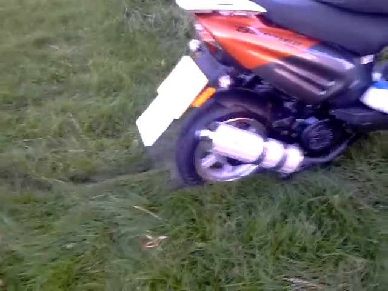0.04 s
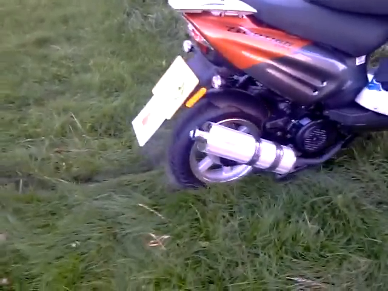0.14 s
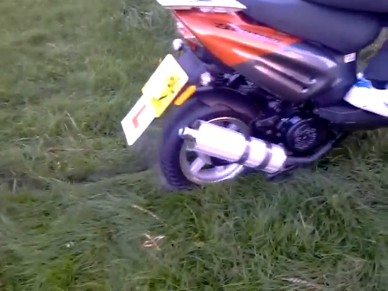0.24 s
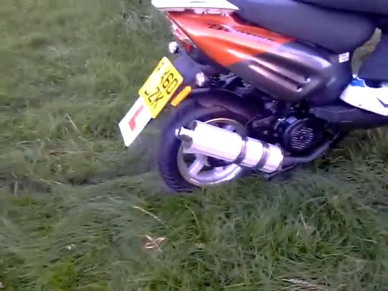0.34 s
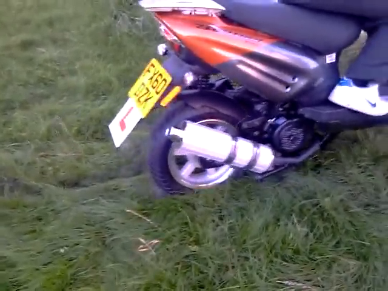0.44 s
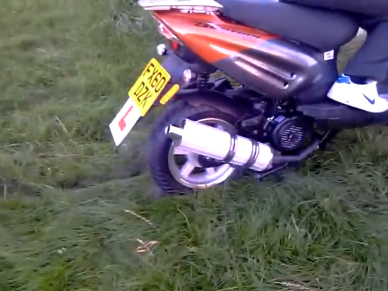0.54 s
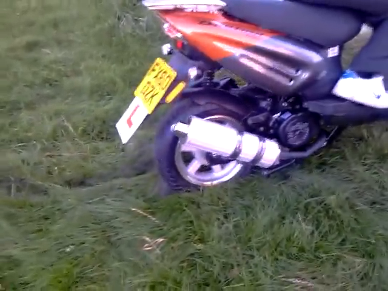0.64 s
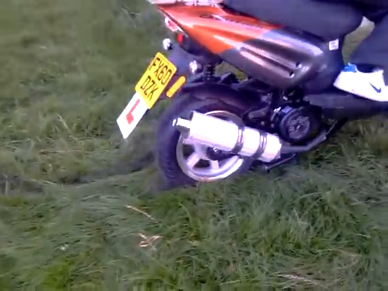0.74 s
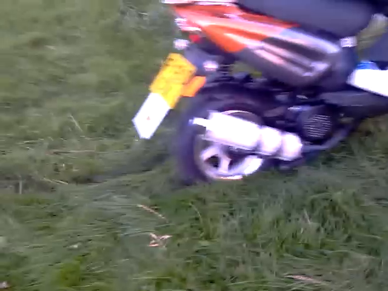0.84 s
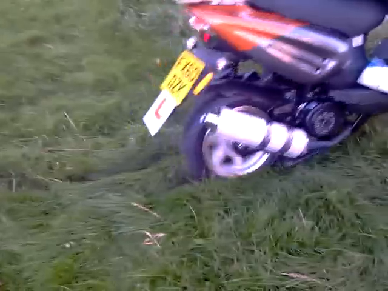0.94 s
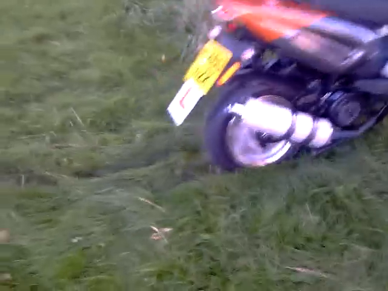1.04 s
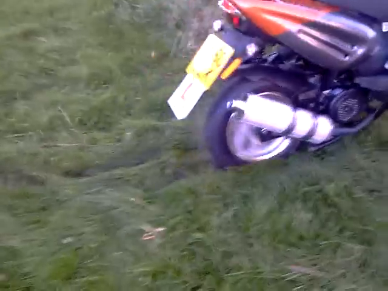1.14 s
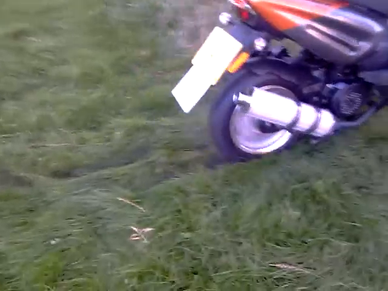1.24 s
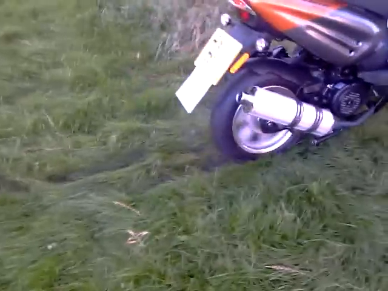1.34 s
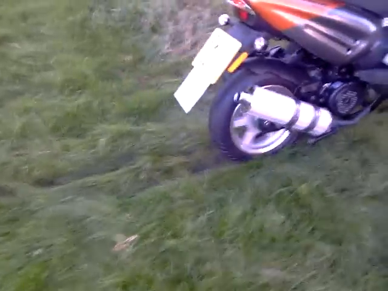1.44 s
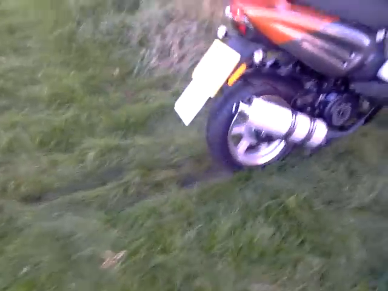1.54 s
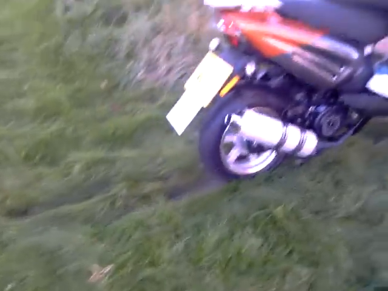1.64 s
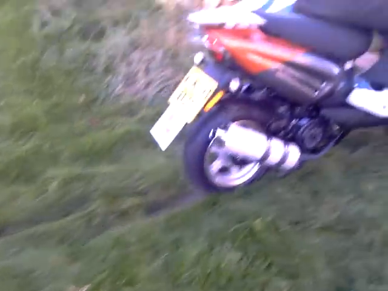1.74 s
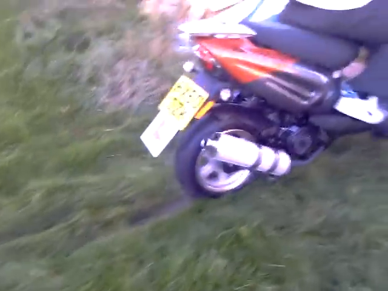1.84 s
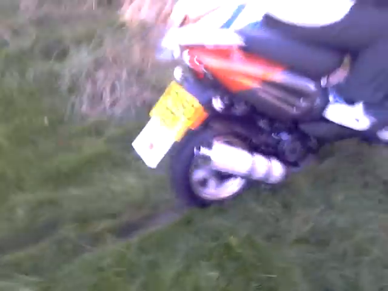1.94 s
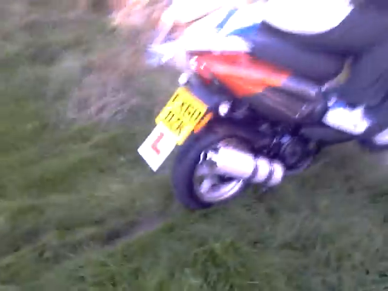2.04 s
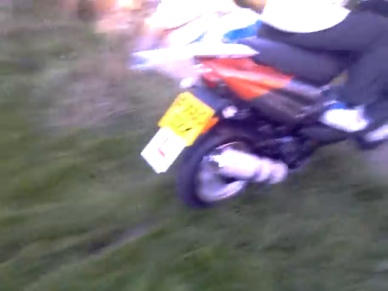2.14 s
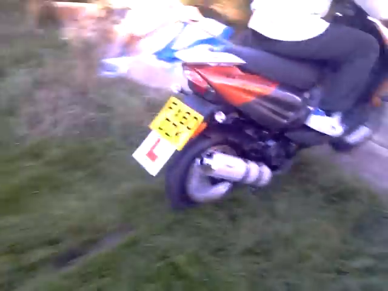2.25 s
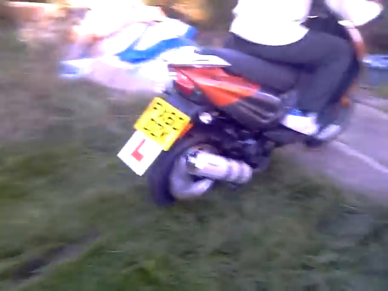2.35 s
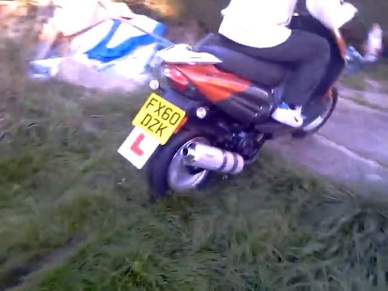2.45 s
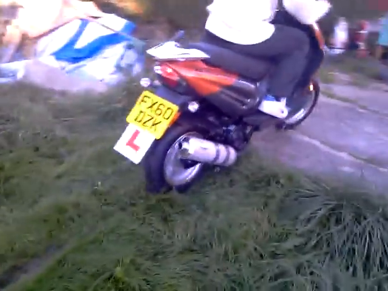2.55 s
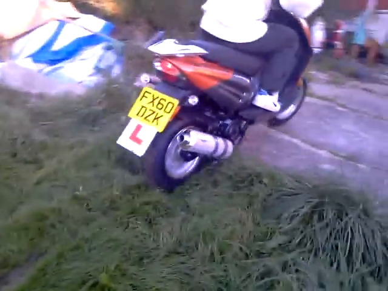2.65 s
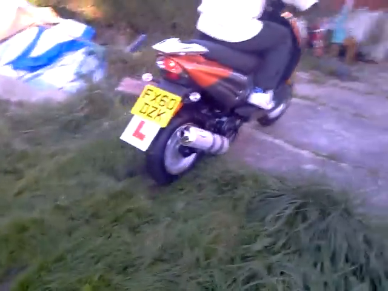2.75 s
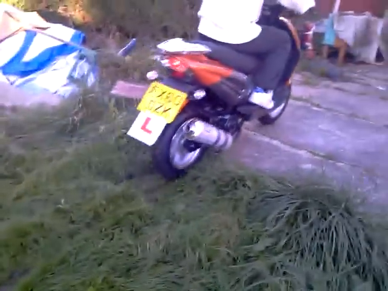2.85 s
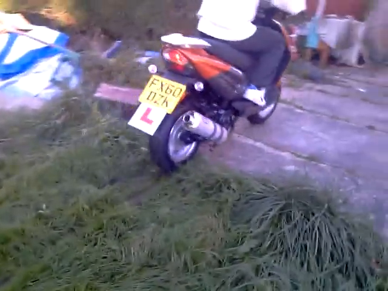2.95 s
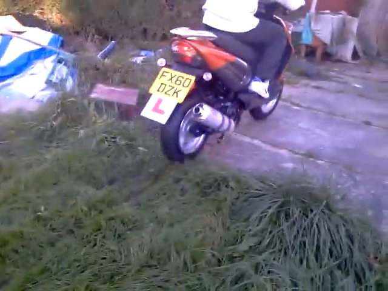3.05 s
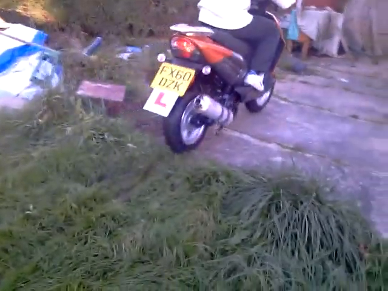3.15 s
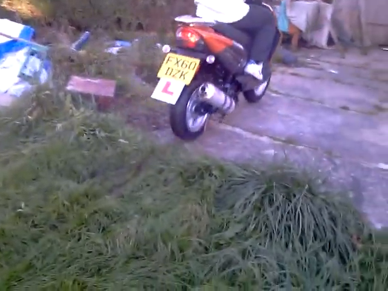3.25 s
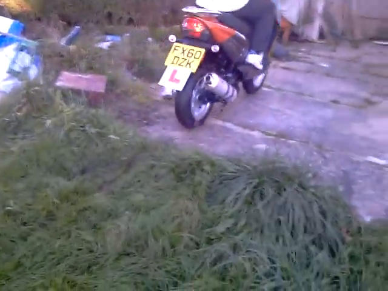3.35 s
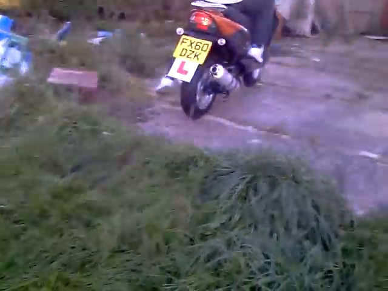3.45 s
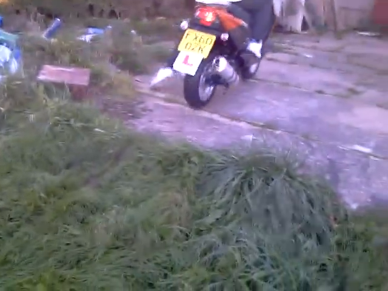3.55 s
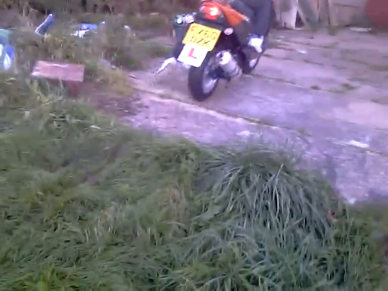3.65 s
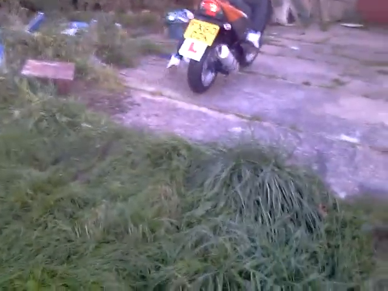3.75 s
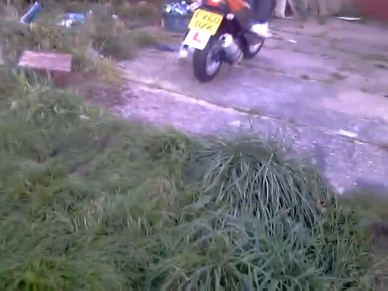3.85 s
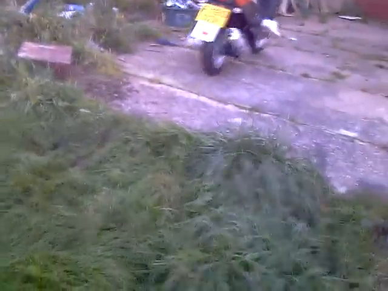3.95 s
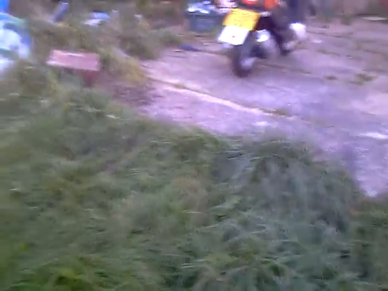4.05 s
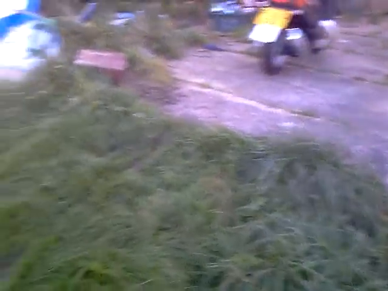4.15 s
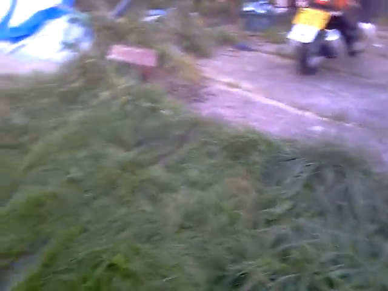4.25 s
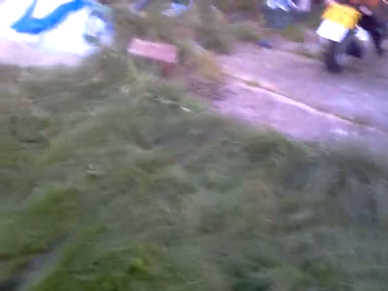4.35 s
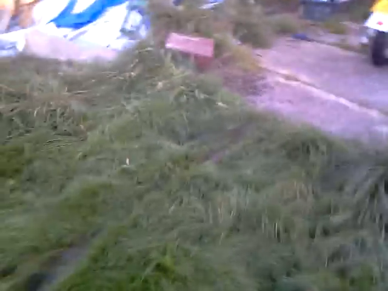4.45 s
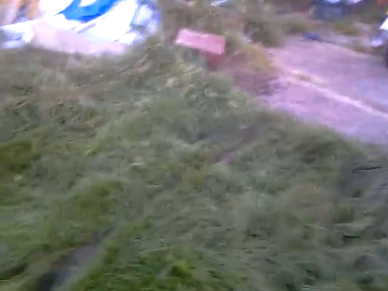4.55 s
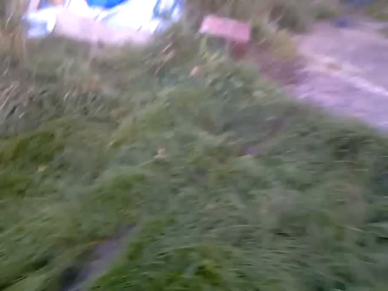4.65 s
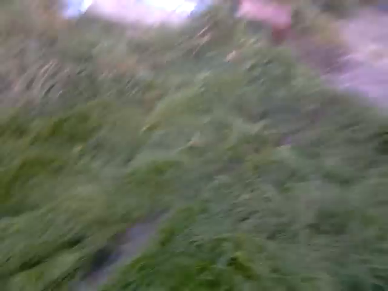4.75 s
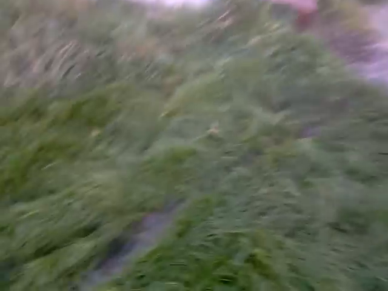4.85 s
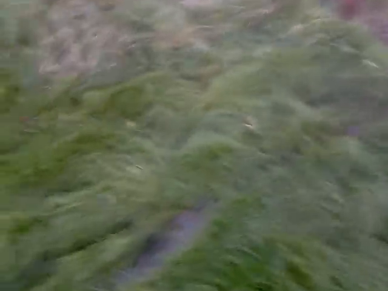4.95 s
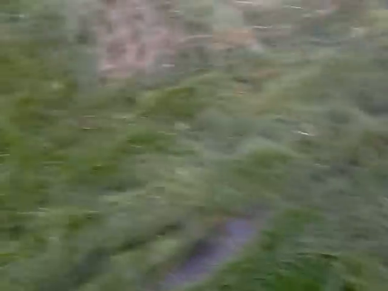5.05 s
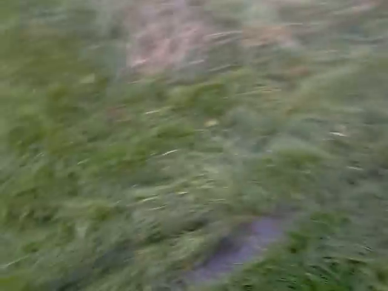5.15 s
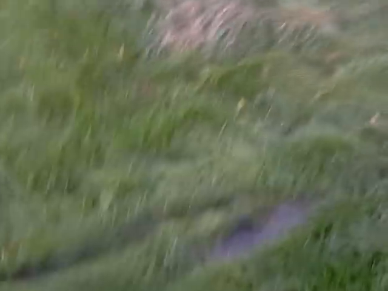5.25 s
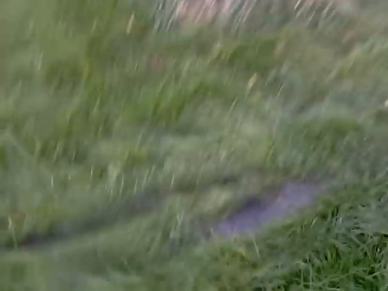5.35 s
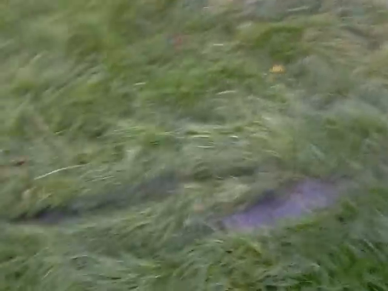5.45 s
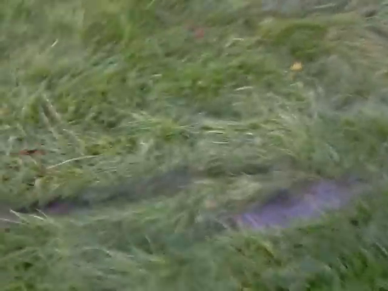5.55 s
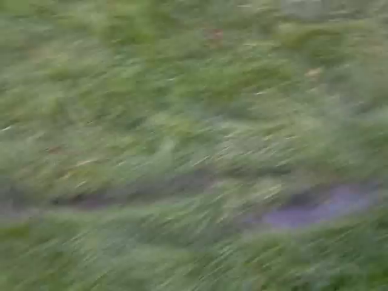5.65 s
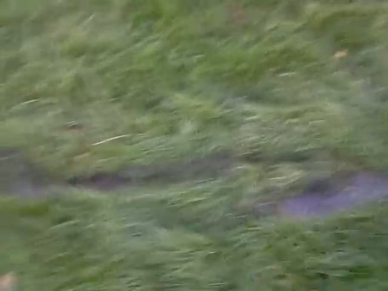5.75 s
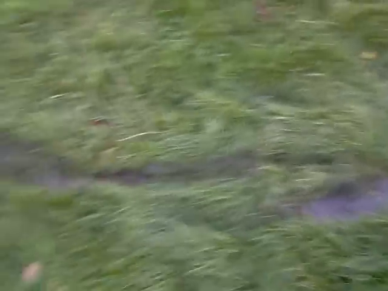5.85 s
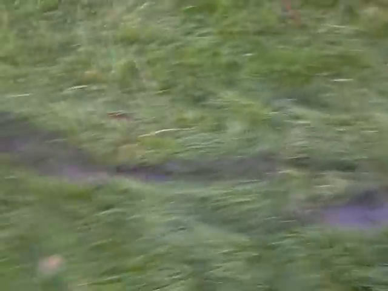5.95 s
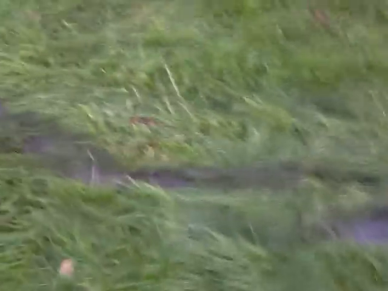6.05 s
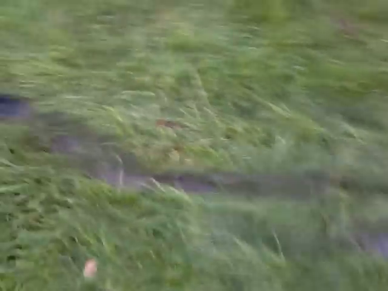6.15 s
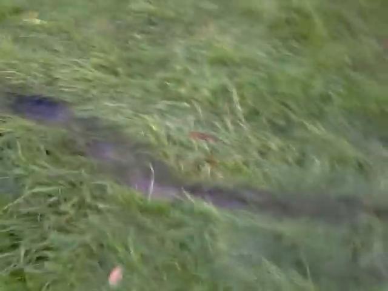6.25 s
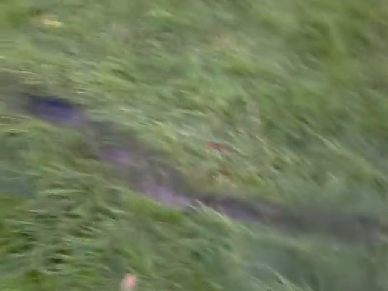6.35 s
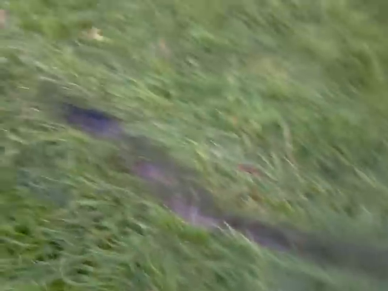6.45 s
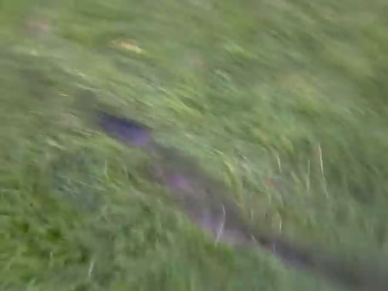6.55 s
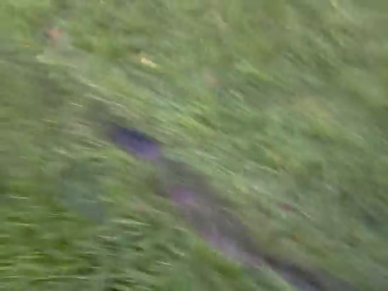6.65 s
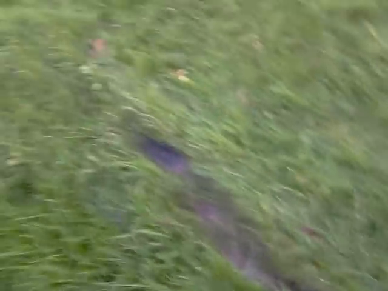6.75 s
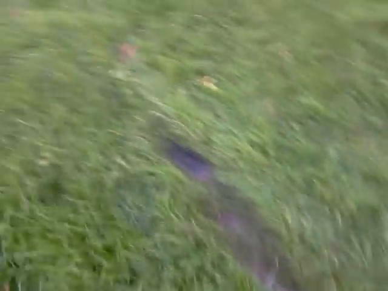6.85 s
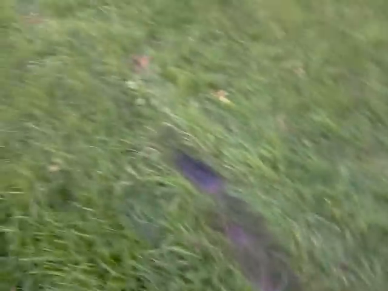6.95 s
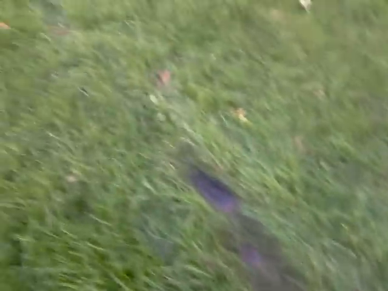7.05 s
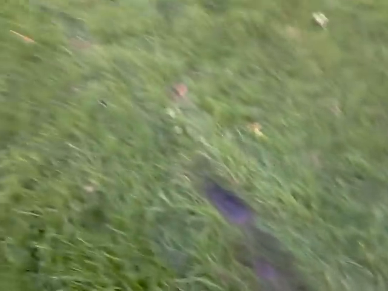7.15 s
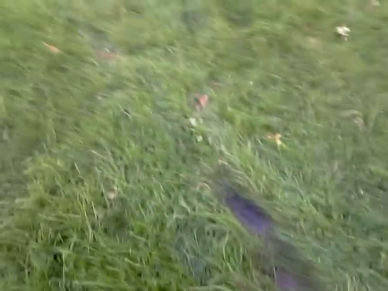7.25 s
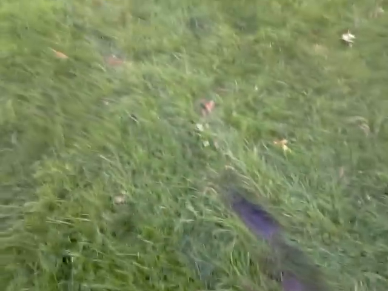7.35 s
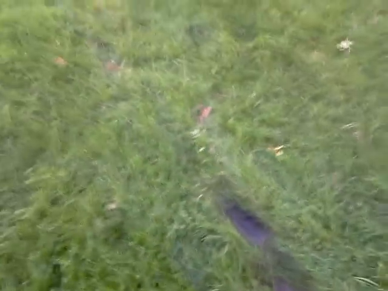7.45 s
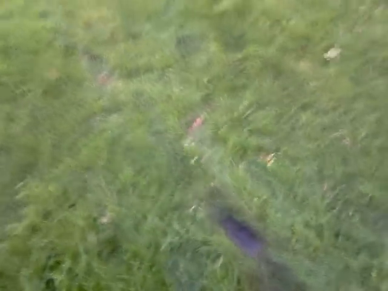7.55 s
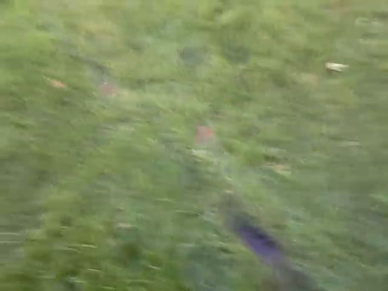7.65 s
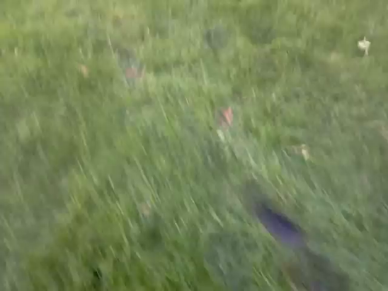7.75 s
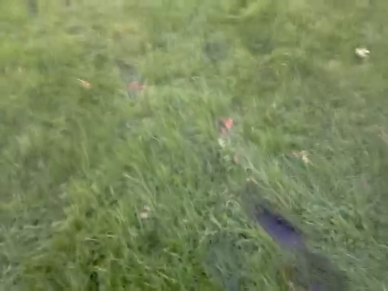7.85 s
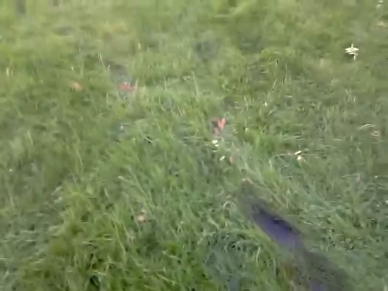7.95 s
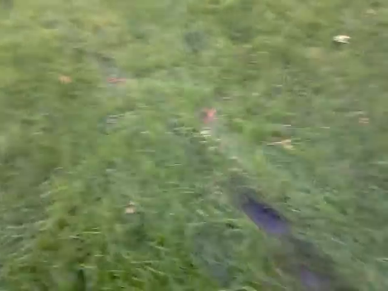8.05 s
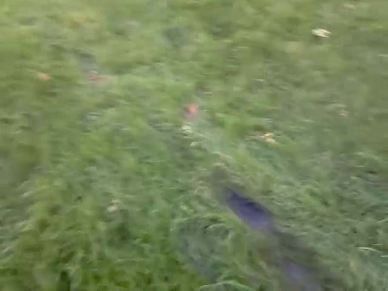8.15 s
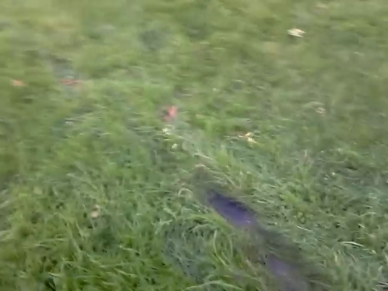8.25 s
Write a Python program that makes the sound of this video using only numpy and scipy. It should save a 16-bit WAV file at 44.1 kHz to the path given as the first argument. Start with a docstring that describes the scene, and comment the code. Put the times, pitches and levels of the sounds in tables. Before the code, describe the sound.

A small scooter engine revs twice on grass, blips briefly, then settles to a clattering idle that thins out and is switched off.

```python
"""A small four-stroke scooter is revved twice on grass, blipped, rolls off onto concrete, idles, is switched off.
Each firing thuds in the silencer; with the throttle open the airbox drones, gas rasps and the engine sings.
Valves and cam chain clatter; ticks, one hard firing crack, bumps and a rough swell ring out; light wind rumbles.
The rear tyre scrubs on the grass in the first rev; a brake squeaks as the scooter stops.
A narrow-band phone microphone listens from a few metres and later turns away, losing treble."""
import sys
import numpy as np
from scipy import signal
from scipy.fft import rfft, irfft
from scipy.io import wavfile
from scipy.ndimage import uniform_filter1d, map_coordinates

SR = 44100
rng = np.random.default_rng(int(sys.argv[2]) if len(sys.argv) > 2 else 0)


def put_to_file(sound):
    """Save the sound as 16-bit audio at rate SR, in the file named by the first command-line argument."""
    columns = np.atleast_2d(sound).T  # one column per channel
    safe = np.clip(columns, -1, 1)
    whole_steps = np.round(safe * 32767)
    wavfile.write(sys.argv[1], SR, whole_steps.astype(np.int16))


N = 365588
TIME = np.arange(N) / SR
IDLE_HZ = 21  # reference idle, firings per second


def undb(db):
    """Decibels to gain."""
    return 10 ** (np.asarray(db) / 20)


def curves(table):
    """Each column of a table, joined by straight lines in time."""
    s, *columns = np.transpose(table)
    return [np.interp(TIME, s, c) for c in columns]


def ramp(start, length):
    """Rises from 0 to 1 over the given seconds."""
    return np.clip((TIME - start) / length, 0, 1)


def noise():
    """White noise."""
    return rng.standard_normal(N)


def walk(rate):
    """Random levels, a new one every 1 / rate s, smoothed into a slow wander."""
    hold = max(int(SR / rate), 1)
    steps = noise()[np.arange(N) // hold]
    return 0.96 * uniform_filter1d(uniform_filter1d(steps, hold), hold)


def steady(x):
    """Unit strength over several engine cycles."""
    power = uniform_filter1d(uniform_filter1d(x * x, size=6600), size=4600)
    return x / np.sqrt(power + 1e-18)


def colour(x, points):
    """Causal (minimum-phase) response of a body with the given (f/Hz, level/dB) outline."""
    hz, db = np.transpose(points)
    size = 8192
    bins_hz = np.arange(size // 2 + 1) * SR / size
    log_gain = np.log(undb(np.interp(np.log(bins_hz + 1), np.log(hz), db)))
    cepstrum = irfft(log_gain)[:size // 2]
    cepstrum[1:] *= 2  # folding the cepstrum makes the response causal
    response = irfft(np.exp(rfft(cepstrum, size)))
    return signal.fftconvolve(x, response)[:N]


def ring(x, hz, width_hz):
    """One resonance, at unit strength."""
    y = signal.lfilter(*signal.iirpeak(hz, hz / width_hz, fs=SR), x)
    return y / y.std()


def strokes(turn, place, scatter_db):
    """One pulse per engine cycle at the given place, each of its own size."""
    at = np.flatnonzero(np.diff(np.floor(turn - place)) > 0)
    pulses = np.zeros(N)
    pulses[at] = undb(scatter_db * noise()[:len(at)])
    return pulses


def gate(turn, place, length, scatter_db):
    """A smooth burst once per cycle, each of its own size."""
    shifted = turn - place + .5
    size = undb(scatter_db * noise()[np.floor(shifted).astype(int)])
    return size * np.exp(-.5 * ((shifted % 1 - .5) / length) ** 2)


def repeating(turn, memory):
    """A jagged vibration tied to the crank angle: each cycle resembles the one before."""
    size = 640  # points per cycle
    memory = np.clip(memory, 0, .97)
    cycles = rng.standard_normal((400, size))
    cycles = signal.lfilter([np.sqrt(1 - memory ** 2)], [1, -memory], cycles, axis=0)
    return map_coordinates(cycles.ravel(), [(turn + 20) * size], order=1)


def knocks(table, width):
    """Noise bursts that die away in one broad resonance each; width is a share of its frequency."""
    out = np.zeros(N)
    for s, db, hz, decay in table:
        start = int(s * SR)
        fade = np.exp(-TIME[:N - start] / decay)
        out[start:] += undb(db) * fade * ring(noise(), hz, hz * width)[start:]
    return out


# engine speed: t/s, f/Hz (firings per second)
FIRING_SPEED = [(0.0, 23.851), (0.498, 19.704), (0.605, 20.831), (0.816, 33.156), (1.165, 42.546),
                (1.216, 36.359), (1.489, 25.575), (1.671, 22.63), (1.93, 36.976), (2.296, 40.211),
                (2.391, 45.656), (2.723, 56.361), (2.978, 36.11), (3.128, 31.32), (3.317, 33.923),
                (3.583, 25.441), (3.999, 21.828), (5.436, 20.772), (6.348, 17.898), (6.829, 19.843),
                (7.088, 19.013), (7.501, 19.097), (7.912, 17.494), (8.29, 7.743)]
START_TURN = .406  # starting place in the engine cycle, 0-1


def engine_speed():
    """Firings per second; each engine cycle holds one firing and two crank turns."""
    return curves(FIRING_SPEED)[0]


# throttle twists, and one brief airbox swell at 2.759 s as the revs fall:
# starts t/s, let go t/s, opening or swell added (0-1)
OPENINGS = [(0.573, 1.12, 0.71), (1.636, 2.667, 0.74), (2.759, 2.824, 0.62), (3.13, 3.29, 0.8)]
OPEN_S, CLOSE_S, IDLE_OPENING = 0.1, 0.098, .04  # time constants of the rise and the fall


def openings():
    """Throttle opening: twists ease open, hold and spring shut; the airbox swell takes the same shape."""
    opening = IDLE_OPENING
    for start, end, size in OPENINGS:
        rise = 1 - np.exp(-np.maximum(TIME - start, 0) / OPEN_S)
        fall = np.exp(-np.maximum(TIME - end, 0) / CLOSE_S)
        opening = opening + size * rise * fall
    return np.clip(opening, 0, 1)


# scooter to microphone as it moves: t/s, distance/m
MIC_DISTANCE = [(0, 1.63), (1.4, 1.17), (2.2, 1.77), (2.7, 1.61), (3.3, 2.36), (3.8, 2.86), (4.6, 2.37),
                (5.3, 2.45), (6.2, 3.05), (8.29, 3.65)]


def distance():
    """Metres from the scooter to the microphone."""
    return curves(MIC_DISTANCE)[0]


def loudness(law, hz, effort):
    """Gain of one part: changes with speed, effort and distance."""
    idle_db, speed_db, effort_db, distance_db = law
    metres = distance()
    doublings = np.log2(metres / metres[0])
    return undb(idle_db + speed_db * (hz - IDLE_HZ) + effort_db * effort + distance_db * doublings)


NEAR_M, NEAR_BASS_HZ, NEAR_BASS = 2.5, 115, 2.5  # bass share added per halving of distance inside NEAR_M


def up_close(x):
    """Near the pipe its lowest tones come through more fully."""
    bass = signal.sosfiltfilt(signal.butter(2, NEAR_BASS_HZ, fs=SR, output="sos"), x)
    return x + NEAR_BASS * np.maximum(np.log2(NEAR_M / distance()), 0) * bass


# silencer and airbox resonances: f/Hz, level/dB
SILENCER_TONE = [(25, -30), (60, -14.5), (85, 1.5), (115, 1), (165, 5.5), (198, 0), (235, -23.5),
                 (400, -26.5), (900, -42)]
AIRBOX_TONE = [(20, -16.5), (38, 1.5), (55, 1.5), (77, 8), (108, -1.5), (155, -17.5), (225, 3.5), (268, -3),
               (315, -14.5), (370, -3), (430, -17), (490, -21), (800, -18.5), (1600, -36)]
# misfiring needs revs above idle and a throttle below this opening
STUMBLE_DEPTH, STUMBLE_RANGE_HZ, STUMBLE_OPENING = .8, 1.5, 0.43


def exhaust(turn, hz, throttle):
    """Closed throttle: separate thuds. Open: the intake gulps half a cycle later and the airbox drones."""
    # on the overrun only every other charge burns well; a weak one is quieter and leaves the pipe late
    overrun = np.clip((hz - IDLE_HZ) / STUMBLE_RANGE_HZ, 0, 1)
    stumble = STUMBLE_DEPTH * overrun * np.clip(1 - throttle / STUMBLE_OPENING, 0, 1)
    sway = stumble * (np.cos(np.pi * turn) + .5 * walk(24))
    early_s = .0065 + .002 * sway
    blow = strokes(turn + early_s * hz, 0, scatter_db=.7) * undb(1.8 * sway)
    # the narrow tailpipe radiates the lowest tones poorly
    piped = signal.lfilter(*signal.butter(2, 80, "high", fs=SR), colour(blow, SILENCER_TONE))
    thud = steady(up_close(piped))
    shudder_tone = [(15, -12.5), (40, -14.5), (130, 6.5), (220, -5.5), (350, -13), (700, -28)]
    shudder = steady(colour(repeating(turn, memory=0.67), shudder_tone))
    # under load the charges burn nearly alike
    firings = strokes(turn, .88, scatter_db=.5)
    gulps = strokes(turn, .38, scatter_db=.8)
    drone = steady(-colour(firings + 0.39 * gulps, AIRBOX_TONE))
    shut = np.sqrt(1 - throttle) * thud + undb(-6.5) * (1 - throttle) * shudder
    return shut + np.sqrt(throttle) * drone


# valve gear knocks in one engine cycle: place/cycles (0-1), spread/cycles, level/dB
VALVE_KNOCKS = [(.95, 0.037, -18), (.15, 0.075, -3.5), (0.5, 0.094, -10), (0.4, .045, -16)]


def clatter(turn, memory):
    """Piston, valves and tappets strike in turn, over a gritty rustle; some tappets click sharply."""
    blows = sum(undb(db) * gate(turn, place, length, scatter_db=2.5) for place, length, db in VALVE_KNOCKS)
    clicks = gate(turn, .56, 0.011, scatter_db=6.5) + gate(turn, .17, 0.011, scatter_db=6.5)
    rustle = 1.65
    return (blows + clicks + rustle) * repeating(turn, memory) * undb(2.4 * walk(900))


# crankcase resonances: f/Hz, level/dB
CASING_TONE = [(60, -23), (200, -7), (290, -1.5), (370, -1), (460, -3.5), (530, -0.5), (610, -3),
               (700, 3.5), (860, -3.5), (1100, -5.5), (1500, -15.5), (3000, -51.5)]
# cam chain whine: f/multiple of the firing rate, level/dB
CHAIN_TONES = [(34, -4.5), (85, -10), (124, -19.5)]
# cam chain whine off throttle: t/s, level/dB against the casing
CHAIN_SHARE = [(0, -1.5), (3.6, -6.5), (4.2, -2), (5.3, 2), (5.9, -15), (6.9, -9.5), (8.29, -3)]
CHAIN_LOAD_DB = -3.5  # at full throttle: a taut chain whines less


def casing(turn, throttle):
    """The crankcase rings with the knocks; the cam chain adds a rough whine, held back by throttle."""
    body = steady(colour(clatter(turn, memory=0.72), CASING_TONE))
    # load takes up the slack, so the dull rattle gives way to the brighter ring
    bright = signal.sosfiltfilt(signal.butter(3, 520, "high", fs=SR, output="sos"), body)
    body = body - 0.3 * throttle * (body - bright)
    jerks = signal.lfilter(*signal.butter(2, 48, fs=SR), repeating(turn, memory=0.56))
    tones = sum(undb(db) * np.sin(2 * np.pi * order * turn + 0.74 * walk(80)) for order, db in CHAIN_TONES)
    whine = steady(tones * (0.76 + steady(jerks)))
    share = undb(curves(CHAIN_SHARE)[0] + CHAIN_LOAD_DB * throttle)
    return (body + share * whine) / np.sqrt(1 + 1.2 * share ** 2)


# engine orders under load: f/multiple of the firing rate, level/dB before load and speed scale it
LOAD_TONES = [(8, -6.5), (10, -11.5), (13, -11), (16, -16), (20, -14), (21, -14.5), (35, -22), (36, -19.5)]


def load_song(turn, hz, throttle):
    """The loaded engine sings on multiples of its firing rate, louder with speed."""
    tones = 0
    for order, db in LOAD_TONES:
        level = undb(db + 2 * walk(10))
        tones = tones + level * np.sin(2 * np.pi * order * turn + 0.45 * walk(30))
    return throttle * np.clip((hz - 22) / 24, 0, 1.2) * tones


# valve cover and gas rasp outlines: f/Hz, level/dB
VALVE_COVER_TONE = [(500, -21), (900, -11), (1200, -2.5), (1550, 2), (1850, 1), (2300, -0.5), (2620, 1.5),
                    (2950, -2.5), (3400, 2), (3700, -6), (4200, 0.5)]
RASP_TONE = [(400, -31.5), (850, -0.5), (1150, -5.5), (1480, 2.5), (1700, -3), (1900, -0.5), (2150, -2.5),
             (2700, 0), (3300, 2), (3650, -1.5), (4200, -4.5)]


def hiss(turn, hz, throttle):
    """Valve ticking gives way to a rasp of gas as the throttle opens."""
    ticking = steady(colour(clatter(turn, memory=0.36), VALVE_COVER_TONE))
    # pulling from low revs, each charge cracks out sharply and dies away
    labour = np.clip((33 - hz) / 7, 0, 1) * np.clip(3 * throttle, 0, 1)
    crack = np.exp(-((turn - .92) % 1) / 0.27)
    puffs = 1.3 + gate(turn, 0.63, 0.056, scatter_db=5) + 0.78 * gate(turn, 1.0, 0.12, scatter_db=3.0)
    puffs = puffs + 5 * labour * crack
    rasp = steady(colour(puffs * repeating(turn, memory=0.51) * undb(0.28 * walk(1100)), RASP_TONE))
    # at high revs the silencer shell rattles once a cycle, by uneven amounts
    rattle = steady(ring(noise() * gate(turn, 0.698, 0.11, scatter_db=3.5), 1720, 530))
    rasp = steady(rasp + undb(-6.5) * np.clip((hz - 32) / 20, 0, 1) * rattle)
    return np.sqrt(1 - throttle) * ticking + np.sqrt(throttle) * rasp


# light wind on the microphone: f/Hz, level/dB
BREEZE_TONE = [(15, -9), (30, -2.5), (60, 1.5), (110, 2), (300, -23.5), (900, -45)]


def breeze():
    """Wind on the microphone: low coloured noise, faint and uneven."""
    return undb(-54.5 + 1.8 * walk(2.6)) * steady(colour(noise(), BREEZE_TONE))


# sharp ticks, and one hard firing crack at 1.779 s: t/s, starting level/dB, ring f/Hz, decay/s
TICKS_AND_CRACK = [(.4105, -22, 3200, 0.0025), (1.779, -11, 3140, 0.0022), (4.36, -34, 3000, 0.046),
                   (4.728, -26.5, 3380, 0.0069), (6.454, -35, 2580, 0.0014), (7.7115, -27, 2200, 0.0025),
                   (7.8138, -25, 1250, 0.0011), (7.8142, -25, 3260, 0.0015)]


def ticks_and_crack():
    """Sharp ticks and one hard firing crack: noise bursts in fairly narrow resonances."""
    return knocks(TICKS_AND_CRACK, width=0.2)


# tyre scrub on grass: f/Hz, level/dB
SCRUB_TONE = [(150, -19.5), (280, 0.5), (360, 7.5), (450, -9), (800, -5), (1100, -9), (1450, -3.5),
              (3000, -17)]
SLIP_S, SLIP_LENGTH_S, SLIP_DB = .95, .13, -26.5  # middle, spread and peak level of the slip


def tyre():
    """The rear tyre slips on grass: a dull scrub that swells and fades as it spins up and grips."""
    slip = np.exp(-.5 * ((TIME - SLIP_S) / SLIP_LENGTH_S) ** 2)
    return undb(SLIP_DB) * slip * steady(colour(noise() * undb(2.5 * walk(120)), SCRUB_TONE))


# brake squeak: t/s, level/dB
BRAKE_LEVEL = [(3.8, -67), (3.92, -35.5), (4.03, -36.5), (4.1, -45.5), (4.17, -39.5), (4.24, -46),
               (4.33, -63)]
BRAKE_HZ = 3650


def brake(turn):
    """A thin squeak, shaken by every turn of the crank."""
    shake = 0.62 + gate(2 * turn, 0.055, 0.066, scatter_db=1.5)  # two crank turns per cycle
    squeak = steady(ring(noise(), BRAKE_HZ, 45) * shake)
    return squeak * undb(curves(BRAKE_LEVEL)[0])


# soft bumps, and one rough, longer swell at 6.32 s: t/s, starting level/dB, ring f/Hz, decay/s
BUMPS_AND_SWELL = [(4.52, -39, 45, 0.029), (4.7, -31, 75, 0.017), (6.32, -40, 403, 0.14),
                   (7.7115, -30.5, 400, 0.0024), (7.799, -31, 350, 0.0049)]


def bumps_and_swell():
    """Soft bumps and one rough, longer swell: noise bursts in very broad resonances."""
    return knocks(BUMPS_AND_SWELL, width=0.8)


# loudness of exhaust, casing and hiss: level/dB at idle speed, shut throttle and starting distance,
# dB per Hz of firing rate, dB at full throttle, dB per doubling of distance
EXHAUST_LOUDNESS = (-35, 0.2536, 11.5, -1.77)
CASING_LOUDNESS = (-37, .42, 6.5, -5.5)
HISS_LOUDNESS = (-33, 0.6028, 4, -2.5)
# the tailpipe swings towards and away from the phone: t/s, level/dB
TAILPIPE_AIM = [(0, 0), (1.9, -0.7), (2.4, 1.3), (2.9, -1.6), (3.7, 0.5), (4.4, -1.5), (5.2, 0.7),
                (7.3, -3.5), (7.9, -1.7)]
# the phone turns its back on the scooter and shades the treble
TURN_AWAY_S, TURNED_S, SHADE_HISS_DB = 3.52, 7.93, -12.5
LUG_HZ, LUG_RANGE_HZ, LUG_DB = 41.4, 8, 3  # pulling hard below this firing rate, the gas rasps louder
SWITCH_OFF_S, DIE_S, PUMPING_DB = 7.9, 0.049, -13  # without a spark the piston only pumps air


def scene():
    """All engine sounds follow one crank angle; speed, throttle and distance set their levels."""
    hz = engine_speed()
    turn = START_TURN + np.cumsum(hz) / SR  # engine cycles
    throttle = openings()
    away = ramp(TURN_AWAY_S, TURNED_S - TURN_AWAY_S)
    lugging = throttle * np.clip((LUG_HZ - hz) / LUG_RANGE_HZ, 0, 1)
    spark = undb(PUMPING_DB * ramp(SWITCH_OFF_S, DIE_S))
    pipe_gain = loudness(EXHAUST_LOUDNESS, hz, throttle) * undb(curves(TAILPIPE_AIM)[0]) * spark
    casing_gain = loudness(CASING_LOUDNESS, hz, throttle)
    hiss_gain = loudness(HISS_LOUDNESS, hz, throttle) * undb(SHADE_HISS_DB * away + LUG_DB * lugging)
    engine = pipe_gain * exhaust(turn, hz, throttle)
    engine += casing_gain * (casing(turn, throttle) + load_song(turn, hz, throttle))
    engine += hiss_gain * hiss(turn, hz, throttle)
    return (engine + breeze() + ticks_and_crack() + tyre() + brake(turn) + bumps_and_swell())[None]


TOP_HZ = 4330  # upper edge of the phone's steep low-pass


def record(dry):
    """The phone rounds strong peaks, low-passes to a narrow band and clips what still overshoots."""
    rounded = np.tanh(.6 * dry) / .6
    narrow = signal.sosfilt(signal.ellip(5, .5, 24, 3700, fs=SR, output="sos"), rounded)
    narrow = signal.sosfilt(signal.ellip(10, .2, 75, TOP_HZ, fs=SR, output="sos"), narrow)
    clipped = np.clip(narrow, -.71, .71)
    # a last low-pass trims the clipping's highest overtones
    return signal.sosfilt(signal.ellip(8, .2, 70, 15800, fs=SR, output="sos"), clipped)


dry = scene()
out = record(dry)
put_to_file(out)
```